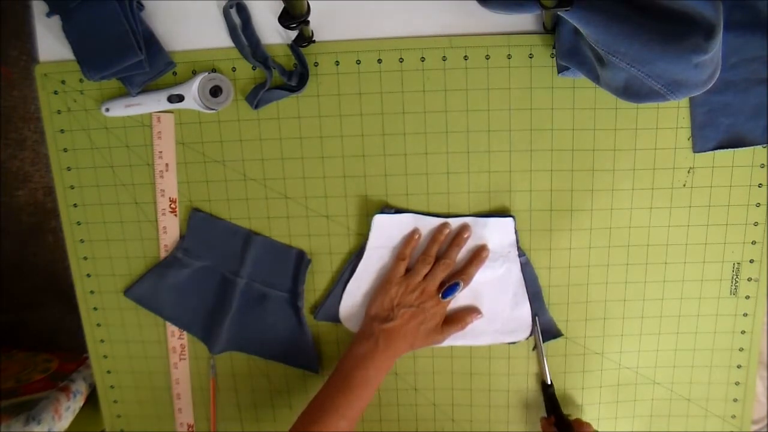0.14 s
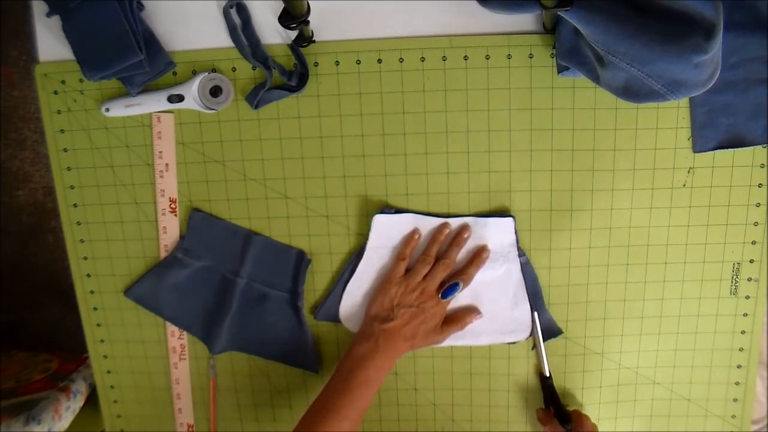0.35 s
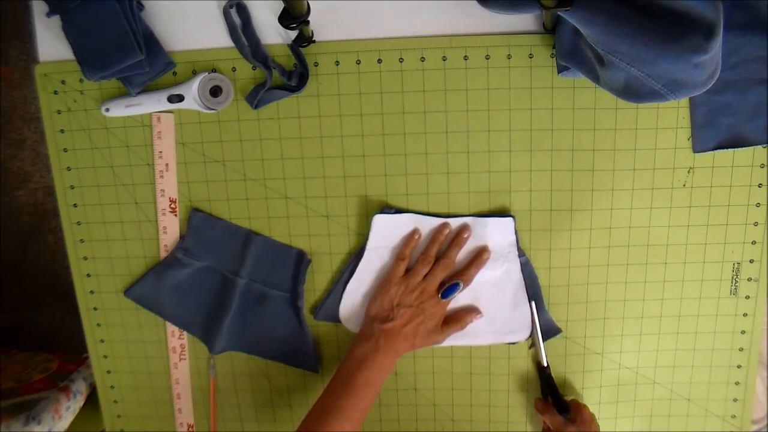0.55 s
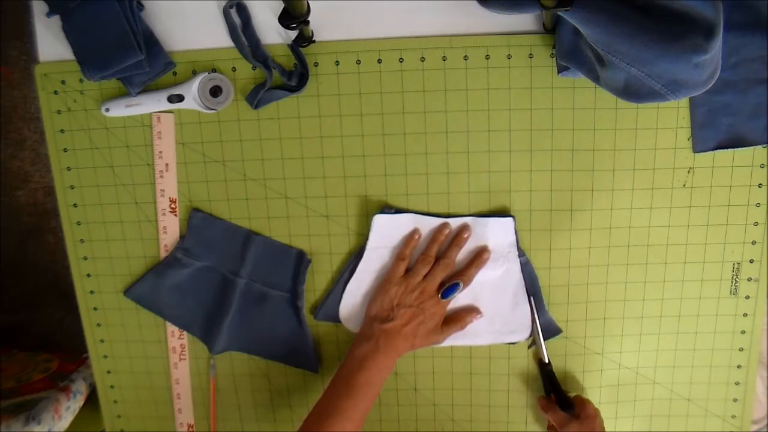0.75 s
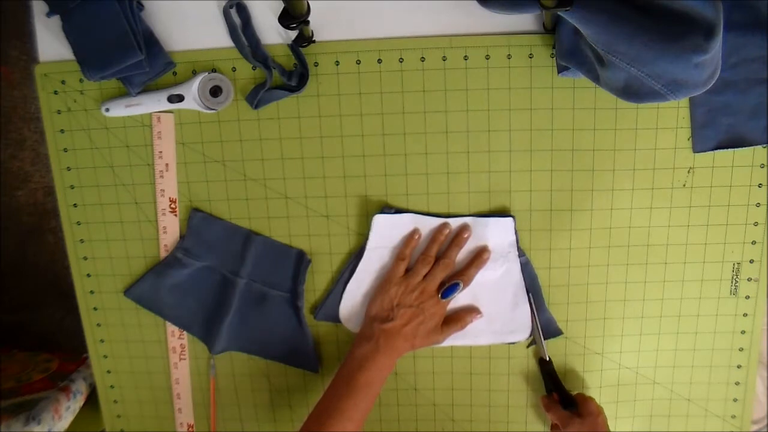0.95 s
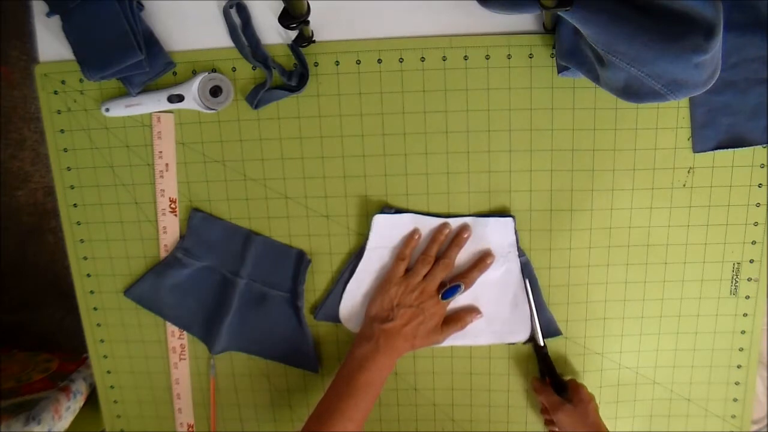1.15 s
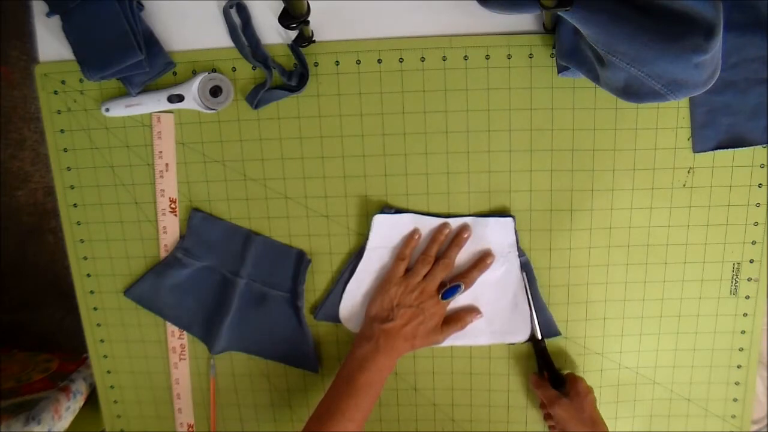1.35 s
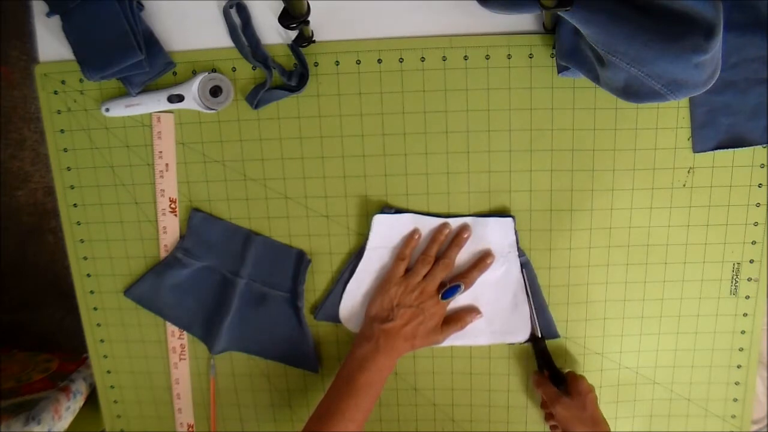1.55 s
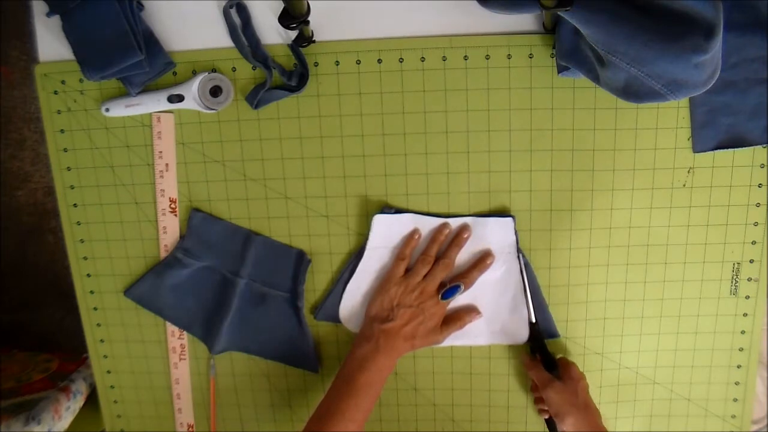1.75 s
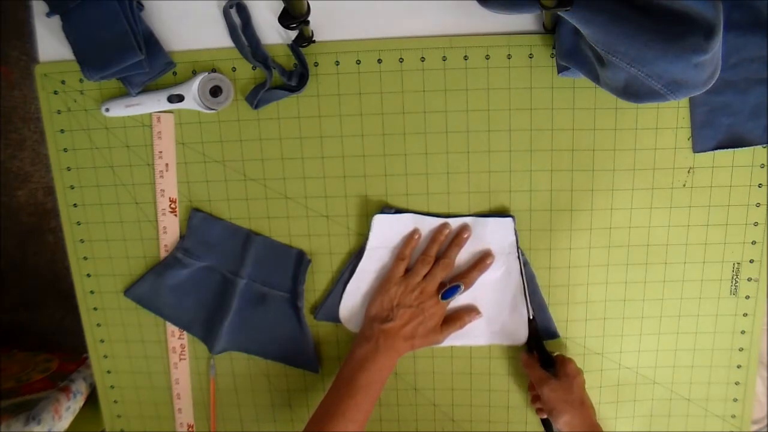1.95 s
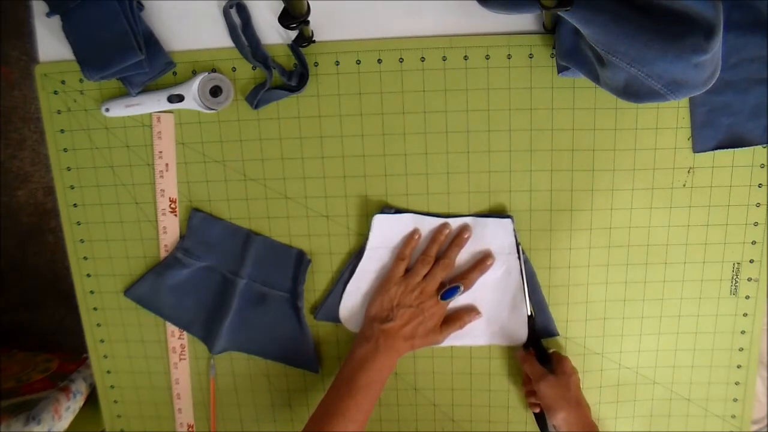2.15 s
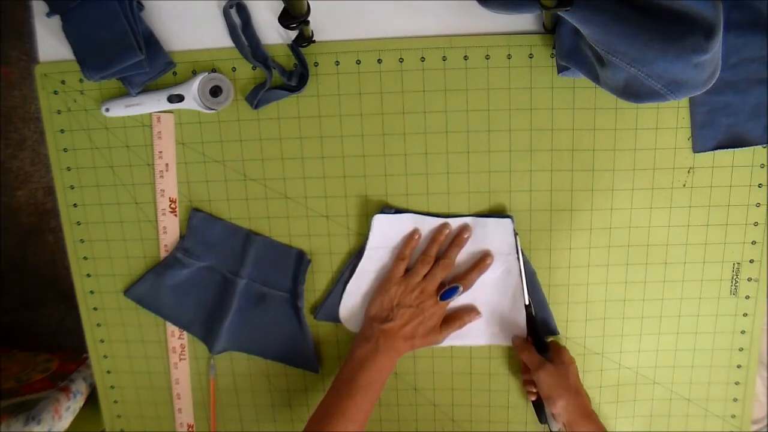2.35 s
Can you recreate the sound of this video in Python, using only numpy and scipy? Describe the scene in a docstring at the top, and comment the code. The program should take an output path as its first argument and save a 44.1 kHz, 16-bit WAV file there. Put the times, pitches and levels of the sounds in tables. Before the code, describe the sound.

Scissors make four crunchy cuts through thick fabric on a table.

```python
"""At a table in a small room, scissors make four cuts through thick fabric, the lower blade on a mat.
Parting threads and snapping yarn drive the table's resonances, heard as crunches and knocks.
The steel edges scrape by stick-slip friction and click home on the last two cuts.
The blades reopen softly after each cut, and the cloth rustles at the end.
Short reflections and a low rumble surround the work."""
import sys
import numpy as np
from scipy import signal
from scipy.fft import rfft, irfft, next_fast_len
from scipy.io import wavfile
from scipy.ndimage import map_coordinates

SR = 44100
rng = np.random.default_rng(int(sys.argv[2]) if len(sys.argv) > 2 else 0)


def int16_out(signal):
    """Quantize to a 16-bit WAV file."""
    q = np.round(np.clip(np.atleast_2d(signal).T, -1, 1) * 32767)
    wavfile.write(sys.argv[1], SR, q.astype(np.int16))


N = 105266

# Closing strokes; the first two form one cut. Each row: start, rise and length in seconds; levels in dB
# of crunch, low, middle and upper table modes, shear and hiss; hiss band centre in Hz; blade ring in dB.
CUT_STROKES = [(-.03, 0.0082, 0.043, -47, 16.5, 13.5, 7, -50, -48, 7700, -59.5),
               (0.101, 0.011, 0.074, -39, 9, 6.5, -3, -43.5, -52, 7100, -50),
               (0.828, 0.023, 0.1, -33.5, -3, 0, -8.5, -44, -44, 8300, -54.5),
               (1.411, 0.011, 0.12, -39, -12.5, -1, 1, -43.5, -45.5, 8900, -56.5),
               (1.953, 0.0021, 0.055, -38, 1, -7, 1, -42.5, -46, 9000, -59.5)]
# Bundles of yarn giving way. Each row: time in seconds, level in dB.
YARN_SNAPS = [(.008, -41), (.113, -25.5), (.119, -28), (.141, -33), (.1695, -23.5), (.848, -29),
              (.870, -27), (.890, -19), (.920, -24), (1.419, -33), (1.4475, -19.5), (1.476, -24),
              (1.497, -24), (1.5395, -20.5), (1.558, -25), (1.9555, -32), (1.966, -29), (1.987, -28),
              (1.996, -30), (2.028, -26)]
# Modes of the table with its mat, and of the blades. Each row: frequency in Hz, width in Hz, level in dB.
TABLE_MODES = [(258, 15, -2), (325, 17, -7), (480, 30, -12), (560, 26, 1.5), (600, 24, 3), (698, 18, -3),
               (738, 20, -5), (830, 30, -12), (940, 30, -8), (1040, 65, 1.5), (1160, 70, -2.5),
               (1300, 55, -10), (1480, 65, -6), (1690, 110, -15)]
BLADE_MODES = [(2500, 250, -12), (5300, 300, 0), (7050, 400, -9), (8400, 350, -5)]
# The edges catch near the tips. Each row: centre in seconds, half length in seconds, level in dB.
EDGE_SQUEAKS = [(.152, .005, -45), (.176, .005, -39), (.205, .012, -53), (.917, .009, -42),
                (.944, .007, -35)]
# Blade impacts. Each row: time in seconds, level in dB, bright band's centre in Hz, its width in octaves,
# its lift in dB, clatter in dB, blade ring in dB.
BLADE_IMPACTS = [(1.5368, -26, 2400, 0.15, 8.5, -1, -7), (1.9846, -18.5, 3560, 0.17, 18, -17, -33),
                 (2.0244, -38.5, 2780, 0.24, 6, 0, -5)]
# The lower blade slides on the mat. Each row: start in seconds, length in seconds, level in dB.
MAT_SLIDES = [(.278, .11, -51), (1.04, .055, -46.5), (1.376, .02, -45), (1.517, .012, -47),
              (1.63, .04, -50), (2.215, .05, -54)]
# Envelope of the sliding cloth. Each row: time in seconds, level in dB.
RUSTLE_LEVELS = [(2.05, -65), (2.2, -63.5), (2.3, -57), (2.35, -56), (2.385, -48)]
# Spectra of the sources. Each row: frequency in Hz, relative spectral density in dB.
SHEAR_SPECTRUM = [(150, 2), (800, 3), (1900, -10), (2500, -1), (3100, -8), (4300, -9), (6200, -18.5),
                  (9000, -17), (14000, -34.5)]
HISS_SPECTRUM = [(1000, 8.5), (4000, -5), (6500, -5), (8000, 1), (9500, 2.5), (10500, 0), (11600, 0.5),
                 (14000, -9)]
CLICK_SPECTRUM = [(200, 6.5), (1200, -6), (2500, 4), (6000, 0), (9000, -2), (14000, -6.5)]
CLOTH_SPECTRUM = [(200, -13), (1000, 1.5), (2000, 2), (3600, 3), (6000, -4), (9000, -11), (14000, -15)]
RUMBLE_SPECTRUM = [(20, -8), (30, -0.5), (44, -11.5), (68, -5), (115, -11), (175, -19), (280, -16.5),
                   (500, -19.5), (900, -24), (1500, -30.5), (4000, -35), (14000, -39)]
# Reverberation of the room. Each row: frequency in Hz, time to fall 60 dB in seconds.
ROOM_T60 = [(200, 0.21), (1000, 0.18), (2500, 0.29), (3500, 0.2), (6000, 0.2), (13000, 0.18)]
# Colour of the reflections. Each row: frequency in Hz, gain in dB.
ECHO_GAIN = [(200, -12.5), (1200, -0.5), (2300, 2), (3500, -0.5), (5500, 2.5)]
# Stereo width of reflections and of rumble. Each row: frequency in Hz, side over mid in dB.
ECHO_WIDTH = [(250, -4), (1100, -24.5), (2200, -19), (4000, -3.5), (13000, 1)]
RUMBLE_WIDTH = [(60, -12), (180, -10), (540, -10), (1620, -2.5), (4840, -1), (14500, -0.5)]
# Faint machine tones. Each row: frequency in Hz, level in dB.
MACHINE_TONES = [(30.5, -61.5), (974.4, -68)]

FIBRES_PER_S, FIBRE_SPREAD_DB = 6000, 3.5
JUDDER_PER_S, JUDDER_DB = 220, 3.5
SHEAR_CHANGE_DB, HISS_CHANGE_DB, RING_CHANGE_DB = 4.5, -12, -3  # from pivot to tips
HISS_LIFT_DB, HISS_HALF_WIDTH_HZ = 2, 377


def crunch():
    """Forced vibration: parting yarn drives the table's modes, whose strengths vary with the cut's place."""
    snaps = sum(amp(db) * impulse(start, grit=.08, t60=.014) for start, db in YARN_SNAPS)
    distances = [abs(clock() - start - length / 2) for start, _, length, *_ in CUT_STROKES]
    nearest_stroke = np.argmin(distances, axis=0)
    out = np.zeros(N)
    for k, (start, rise, length, db, low_db, middle_db, upper_db, *_) in enumerate(CUT_STROKES):
        threads = amp(db) * stroke(start, length, rise, release=.034) * grains(rate=1800, spread_db=3)
        place = [(330, low_db), (480, 0), (610, 0), (690, middle_db), (940, middle_db), (1030, upper_db)]
        modes = [(hz, width, level + along(place, hz)) for hz, width, level in TABLE_MODES]
        out += resonate(threads + snaps * (nearest_stroke == k), modes)
    return out


def edges():
    """Stick-slip friction: fibres shear and steel rubs, hissing near the pivot, squeaking near the tips."""
    def rub(envelope):
        fibres = grains(FIBRES_PER_S, FIBRE_SPREAD_DB)
        return envelope * unit(fibres * amp(JUDDER_DB * wobble(JUDDER_PER_S)))

    shear, hiss, ring = np.zeros((3, N))
    for start, rise, length, *_, shear_db, hiss_db, band_hz, ring_db in CUT_STROKES:
        press = stroke(start, length, rise, release=.01)
        travel = np.clip((clock() - start) / length, 0, 1) - .5  # where the edges cross
        shear += press * amp(shear_db + SHEAR_CHANGE_DB * travel)
        ring += press * amp(ring_db + RING_CHANGE_DB * travel)
        scrape = rub(press * amp(hiss_db + HISS_CHANGE_DB * travel))
        band = lambda f: np.exp(-((f - band_hz) / HISS_HALF_WIDTH_HZ) ** 2)
        hiss += coloured(scrape, lambda f: along(HISS_SPECTRUM, f) + HISS_LIFT_DB * band(f))
    for centre, half_length, db in EDGE_SQUEAKS:
        ring += amp(db) * np.exp(-((clock() - centre) / half_length) ** 2)
    return shaped(rub(shear), SHEAR_SPECTRUM) + hiss + resonate(rub(ring), BLADE_MODES)


def clicks():
    """Impact excitation: the blades meet with a crack, then clatter and ring briefly in their modes."""
    out = np.zeros(N)
    for start, db, band_hz, octaves, lift_db, clatter_db, ring_db in BLADE_IMPACTS:
        clatter, ring = rng.standard_normal((2, N)) * decay(clock() - start, t60=.045)
        blow = impulse(start, grit=.55, t60=.007) + amp(clatter_db) * clatter
        band = lambda f: np.exp(-.5 * (np.log2((f + 1) / band_hz) / octaves) ** 2)
        crack = coloured(blow, lambda f: along(CLICK_SPECTRUM, f) + lift_db * band(f))
        out += amp(db) * (crack + amp(ring_db) * resonate(ring, BLADE_MODES))
    return out


def mat_slides(cutoff_hz=1200, scrape_db=-16):
    """Sliding friction: the lower blade rubs the mat, mostly on reopening, too slowly to stir high modes."""
    envelope = sum(amp(db) * stroke(start, length, attack=.012, release=.06)
                   for start, length, db in MAT_SLIDES)
    friction = envelope * grains(FIBRES_PER_S, FIBRE_SPREAD_DB)
    table = filtered(resonate(friction, TABLE_MODES), lambda f: 1 / np.sqrt(1 + (f / cutoff_hz) ** 4))
    return table + amp(scrape_db) * shaped(friction, SHEAR_SPECTRUM)


def rustle():
    """Friction noise: cloth slides under the hand in many tiny, uneven slips."""
    times, db = np.transpose(RUSTLE_LEVELS)
    envelope = amp(np.interp(clock(), times, db, left=-120))
    return envelope * shaped(grains(rate=4100, spread_db=9.5), CLOTH_SPECTRUM)


def room(x, early_db=-7.5, tail_db=-7, build_s=.0067):
    """Reverberation: quick reflections off the table precede a tail whose decay depends on frequency."""
    hz, t, spectrum = signal.stft(rng.standard_normal((2, SR // 2)), SR, nperseg=256)
    tail = signal.istft(spectrum * decay(t, along(ROOM_T60, hz)[:, None]), SR, nperseg=256)[1]
    lag = np.arange(tail.shape[1]) / SR
    tail *= np.clip(lag / build_s, 0, 1)
    early = rng.standard_normal(tail.shape) * decay(lag - .001, t60=.019)
    response = amp(tail_db) * tail / np.linalg.norm(tail[0])
    response += amp(early_db) * early / np.linalg.norm(early[0])
    reflections = signal.fftconvolve(x[None], response, axes=1)[:, :N]
    return stereo(reflections, ECHO_GAIN, ECHO_WIDTH)


def background(rumble_db=-51):
    """Superposition: low rumble and hiss add to faint, steady machine tones."""
    rumble = unit(stereo(rng.standard_normal((2, N)), RUMBLE_SPECTRUM, RUMBLE_WIDTH))
    hum = sum(amp(db) * np.sqrt(2) * np.sin(2 * np.pi * (hz * clock() + rng.random()))
              for hz, db in MACHINE_TONES)
    return amp(rumble_db) * rumble + hum


def impulse(start, grit, t60):
    """Impulsive force: one spike trailed by decaying grit, with the energy of 2 ms at rms 1."""
    burst = grit * rng.standard_normal(N) * decay(clock() - start, t60)
    burst[round(start * SR)] += 1
    return burst / np.linalg.norm(burst) * np.sqrt(.002 * SR)


def grains(rate, spread_db):
    """Shot noise: random impulses of uneven size, rate a second, at rms 1."""
    spikes = (rng.random(N) < rate / SR) * rng.choice([-1, 1], N)
    return unit(spikes * amp(spread_db * np.clip(rng.standard_normal(N), -2, 2)))


def wobble(rate):
    """Random modulation: a smooth curve with rate knots a second."""
    return map_coordinates(rng.standard_normal(N // 10), [clock() * rate], mode="wrap")


def stroke(start, length, attack, release):
    """Force envelope: linear rise, hold and exponential release, all in seconds."""
    t = clock() - start
    return np.clip(t / attack, 0, 1) * np.exp(-np.maximum(t - length, 0) / release)


def decay(t, t60):
    """Damping: an exponential fall from t = 0, by 60 dB in t60 seconds."""
    return (t >= 0) * np.exp(-np.log(1000) * np.maximum(t, 0) / t60)


def resonate(x, modes):
    """Modal superposition: x drives damped resonators of alternating sign, at unit power gain."""
    def response(f):
        return unit(sum((-1) ** k * amp(db) * 1j * f * width / (hz * hz - f * f + 1j * f * width)
                        for k, (hz, width, db) in enumerate(modes)))
    return filtered(x, response)


def shaped(x, points):
    """Spectral shaping: x takes the colour of (Hz, dB) points."""
    return coloured(x, lambda hz: along(points, hz))


def coloured(x, curve_db):
    """Minimum phase: a causal filter of unit power gain follows a dB function of frequency."""
    def response(hz):
        gain = unit(amp(curve_db(hz)))
        cepstrum = irfft(np.log(gain + 1e-9))
        half = len(cepstrum) // 2
        return np.exp(rfft(np.r_[cepstrum[0], 2 * cepstrum[1:half], np.zeros(half)]))
    return filtered(x, response)


def filtered(x, response):
    """Linear filtering: the spectrum of x is multiplied by a frequency response."""
    size = next_fast_len(N + SR // 2)
    return irfft(rfft(x, size) * response(np.fft.rfftfreq(size, 1 / SR)), size)[..., :N]


def stereo(mid_side, colour, width):
    """Sum and difference: mid and side, weighted by (Hz, dB) points, give left and right."""
    mid, side = filtered(mid_side, lambda f: amp(along(colour, f)))
    side = filtered(side, lambda f: amp(along(width, f)))
    return np.array([mid + side, mid - side])


def along(points, hz):
    """Interpolation of (Hz, value) points on a logarithmic axis."""
    frequencies, values = np.transpose(points)
    return np.interp(np.log(hz + 1), np.log(frequencies + 1), values)


def amp(db):
    """Decibels as an amplitude ratio."""
    return 10 ** (np.asarray(db) / 20)


def unit(x):
    """Normalisation to rms 1."""
    return x / np.sqrt(np.mean(abs(x) ** 2) + 1e-20)


def clock():
    """Time of every sample in seconds."""
    return np.arange(N) / SR


def scene():
    """Direct and reflected sound: scissors and cloth lie in the middle of a quiet room."""
    direct = crunch() + edges() + clicks() + mat_slides() + rustle()
    return amp(-1.5) * (direct + room(direct)) + background()


def record(dry):
    """Band limiting: the treble ends in a steep linear slope."""
    top_hz, slope_hz = 14250, 200
    return filtered(dry, lambda hz: np.clip((top_hz - hz) / slope_hz + .5, 0, 1))


dry = scene()
out = record(dry)
int16_out(out)
```